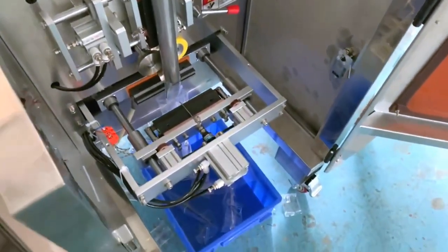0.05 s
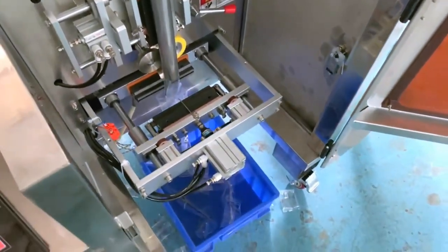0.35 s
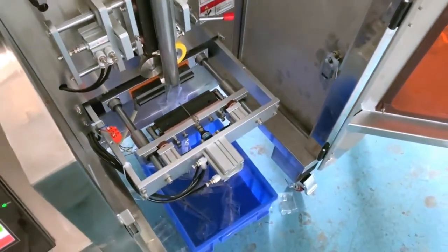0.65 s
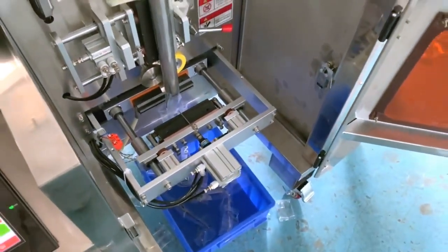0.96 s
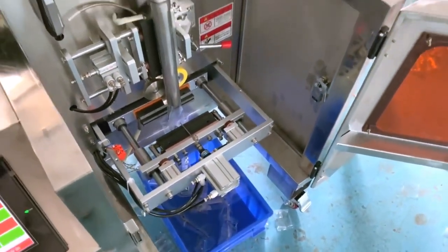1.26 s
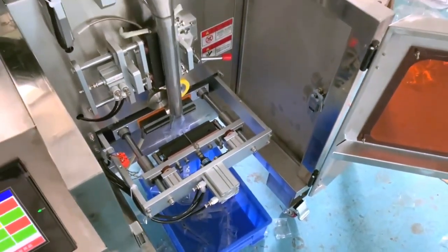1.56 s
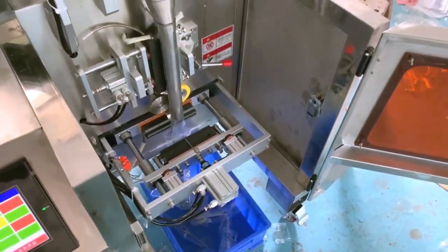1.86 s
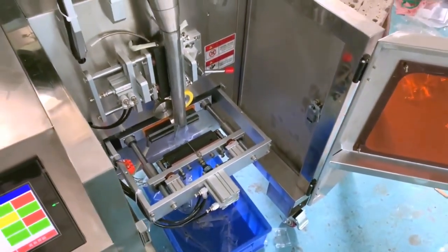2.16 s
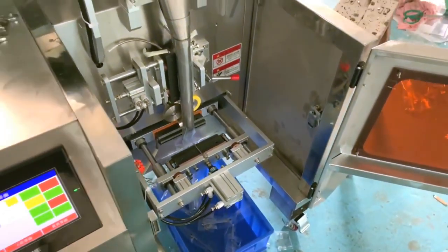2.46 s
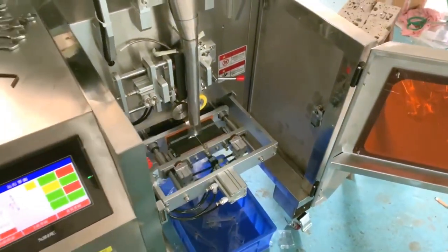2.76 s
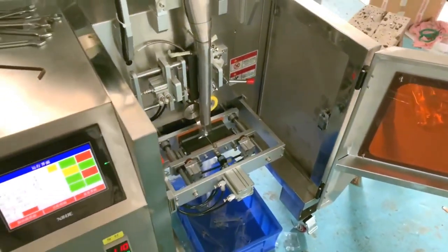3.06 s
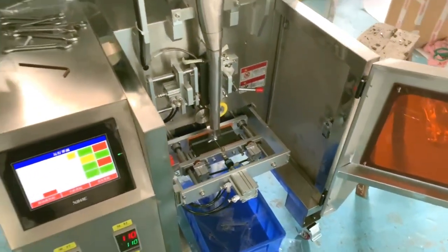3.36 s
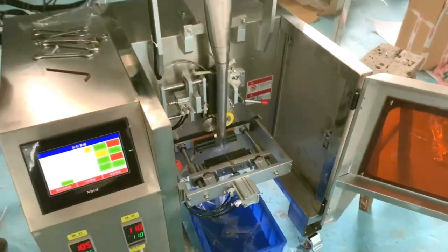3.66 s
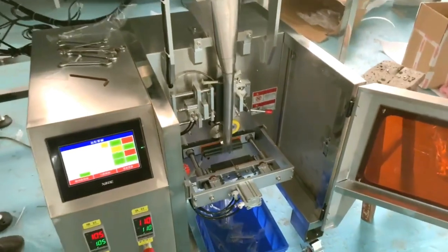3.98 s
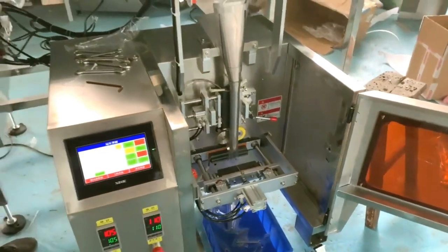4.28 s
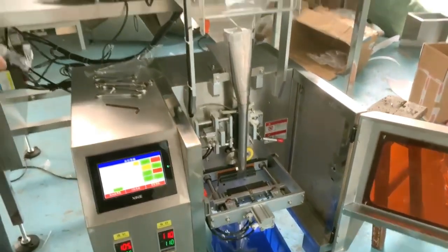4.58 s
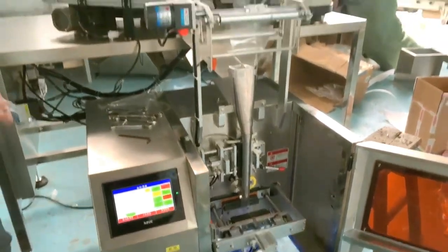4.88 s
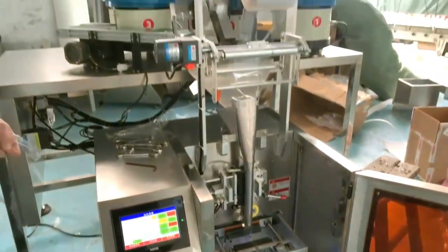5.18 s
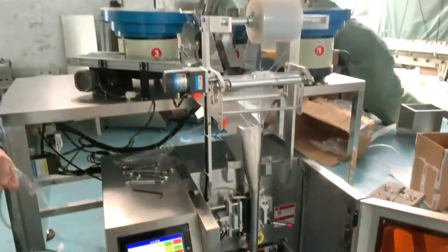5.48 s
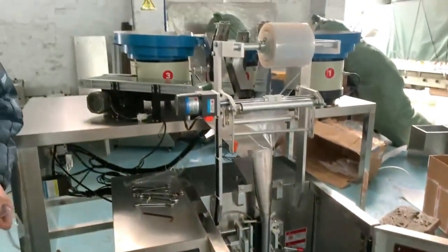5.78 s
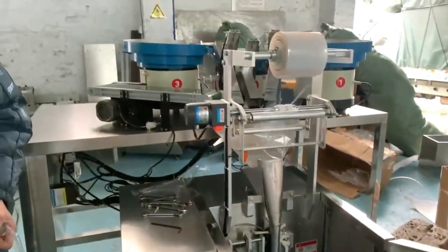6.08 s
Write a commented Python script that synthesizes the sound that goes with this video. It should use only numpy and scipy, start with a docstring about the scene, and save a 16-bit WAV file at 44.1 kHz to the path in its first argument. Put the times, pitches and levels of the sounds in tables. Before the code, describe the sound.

Small metal parts clatter down a chute and pour into a ringing funnel while a bagging machine puffs air and clacks in a factory hall.

```python
"""Small steel parts clatter on a chute and later pour down a ringing funnel: a bagging machine at work.
Each part cracks, clinks at its own pitches and sets the sheet steel ringing. Air cylinders puff, thud
the sealing jaws shut, knock them open with a squeak and snap a gate. At the start, vibrating bowl
feeders jingle and hum, then stop. It all echoes in a factory hall over the drone of other machines."""
import sys
import numpy as np
from scipy import signal
from scipy.fft import rfft, irfft, next_fast_len
from scipy.io import wavfile
from scipy.ndimage import map_coordinates

SR = 44100
rng = np.random.default_rng(int(sys.argv[2]) if len(sys.argv) > 2 else 0)


def output_pcm(signal):
    """Save a mono or channel-first signal as 16-bit PCM at the path in sys.argv[1].

    Samples are clipped to [-1, 1] before scaling.
    """
    pcm = np.clip(np.atleast_2d(signal).T, -1, 1) * 32767
    wavfile.write(sys.argv[1], SR, np.round(pcm).astype(np.int16))


N = 274961
TIME = np.arange(N) / SR

# Parts hitting the chute; the three strengths feed the layers of each hit:
# (time [s], hit [dB], clang [dB], clang pitch [Hz], blow to the sheet [dB], spot's favoured pitch [Hz])
STRIKES = [(0.346, -16.5, -44, 4500, -32, 900), (0.3586, -9, -13.5, 3976, -24, 900),
           (0.4051, -10.5, -27, 5200, -23.5, 1250), (0.421, -25.5, -39.5, 4053, -28, 1250),
           (0.4363, -14, -37, 4940, -37, 1100), (0.54, -25, -42.5, 3800, -43, 900),
           (0.711, -18, -32, 5280, -21.5, 1700), (0.7283, -11.5, -22, 4210, -12.5, 1150),
           (0.7497, -15.5, -21.5, 3870, -17, 1400), (0.764, -17, -31, 3970, -22, 1200),
           (0.7859, -10, -30, 4700, -23.5, 1500), (0.8, -16, -37.5, 3440, -31, 1200),
           (0.92, -19, -51, 4570, -36.5, 1000), (0.934, -17, -40, 5170, -22.5, 1000),
           (0.95, -16.5, -39.5, 3820, -28, 1400), (1.041, -11.5, -19, 3470, -14, 1010),
           (1.06, -27, -25, 3970, -19, 1800), (1.086, -11, -39, 3380, -24.5, 2300),
           (1.0906, -8, -28.5, 3930, -20, 2000), (1.106, -25, -36, 4780, -28.5, 1900),
           (1.1491, -15.5, -36, 4140, -42, 1200), (1.257, -19, -45, 3750, -23.5, 1000),
           (1.317, -22, -40, 4600, -27, 1500), (1.3775, -13, -25, 3690, -30, 1600),
           (1.4024, -22, -26.5, 3746, -18.5, 900), (1.42, -17, -31, 3760, -17, 950),
           (1.4596, -29, -28, 4830, -21.5, 1000), (1.482, -24, -27.5, 3757, -32, 900),
           (1.5362, -18.5, -36.5, 4780, -37, 1200), (1.548, -29, -39.5, 2620, -36, 1500),
           (1.5895, -16, -32.5, 6630, -27, 1200), (1.611, -30, -34, 5200, -26, 1100),
           (1.714, -36.5, -49, 4570, -35, 900), (1.7746, -12.5, -30, 3760, -32, 1400),
           (1.787, -22.5, -40.5, 5500, -35.5, 1400), (1.8003, -19.5, -39, 6440, -30, 1400),
           (1.823, -34, -49.5, 4640, -38.5, 1200), (1.892, -43.5, -45, 6220, -38.5, 1200)]
# Body of a struck part: (pitch ratio [x], level [dB], t60 [s])
CLANG_MODES = [(1, 0.5, 0.059), (1.085, 1, 0.018), (0.87, -7.5, 0.03), (1.27, -4, 0.019), (1.42, -1, 0.018)]
# Ring of a part, the chute, the funnel and the gate: (pitch [Hz], level [dB], t60 [s])
PING_MODES = [(9700, 5.5, 0.016), (11300, 10, 0.005), (11650, 2.5, 0.023), (11100, -14, 0.023),
              (12560, -10, 0.011)]
CHUTE_MODES = [(638, -5.5, 0.24), (678, -9.5, 0.84), (800, -2, 0.4), (891, 2.5, 0.32), (1043, -2, .2),
               (1129, -2.5, 0.14), (1178, -2, 0.32), (1305, -3.5, 0.27), (1415, -6, .32),
               (1722, -0.5, 0.64), (1900, 2, 0.32), (1980, -9, 0.33), (2353, -8, 0.16), (3215, -3, 0.1)]
FUNNEL_MODES = [(139.4, -17, 1.9), (284, -15.5, 10.6), (371, -17, 5.8), (378.4, -13, 12), (440, -17, 3.3),
                (637, -16.5, 6.4), (678, -3.5, 0.88), (728, 3.5, 0.73), (797, 0.5, 0.46), (806, -5.5, 5),
                (891.7, 2.5, 0.63), (985.4, 3.5, 0.54), (1046, -7.5, 2.3), (1093, -2.5, 0.47),
                (1301, -12, 1.2), (1424, -4, 0.86), (1464, -6, 2), (1536, -1, 0.4), (1594, -11, 2.7),
                (1690, -5, 0.46), (1740, 0.5, 0.358), (1882, 1, 0.53), (2181, -3.5, 0.9), (2460, -2, 0.24),
                (2483, 0.5, 0.19), (2950, -1, 0.23), (3138, 1, 0.1), (3350, 4, 0.23), (3920, -6, 0.23)]
GATE_MODES = [(1950, 7.5, 0.046), (2116, 7.5, 0.04), (2340, 3, .04), (11000, 9, 0.1), (11410, 10.5, 0.067),
              (14900, -7, .08)]
# Tones of the low hum that lingers after the jaws meet: (pitch [Hz], relative level [dB], t60 [s])
LOW_HUM_MODES = [(87, -2, 1.66), (122, -7.5, 1.6), (143.6, -4.5, 1.35), (187.3, 2, 1.75), (195.8, -6, 1.4),
                 (259, 0, 1.2), (317, 0.5, 0.62), (690, -8.5, 1.1)]
# Tone of the parts cracking, rattling, hitting sheet steel, tumbling, jingling: (frequency [Hz], gain [dB])
CRACK_EQ = [(300, -27), (1500, -6), (2600, -19.5), (3500, -4), (4800, -4), (5800, -5), (7200, 4.5),
            (9000, 9.5), (11500, -0.5), (16000, -1)]
RATTLE_EQ = [(800, -17.5), (1800, -4.5), (2700, -11), (3600, 5.5), (4300, 0.5), (5200, 4.5), (6500, -3.5),
             (11000, -17.5), (16000, -10)]
SHEET_EQ = [(100, -23.5), (400, -3.5), (580, -6), (750, 1), (1400, 3), (2200, -2.5), (3400, -1),
            (5000, -6.5), (10000, -25.5)]
TUMBLE_EQ = [(500, -13.5), (1800, -7), (2600, -0.5), (3200, 1), (4200, -1), (5500, 2), (7200, 7),
             (10500, 3), (16000, 1.5)]
JINGLE_EQ = [(150, -20), (400, -6), (700, -0.5), (1500, -6), (2500, -6), (3600, -3), (5000, -4.5),
             (7500, 0.5), (10500, 2.5), (12000, 2.5), (16000, -3)]
# Heavy landings in the funnel: (time [s], clink strength [dB], blow to the wall [dB], attack [s])
LANDINGS = [(5.047, -14.5, -29.5, 0.0011), (5.072, -26, -28, 0.0021), (5.1453, -15, -41, 0.002),
            (5.18, -28, -34, 0.0027), (5.247, -22, -29.5, 0.0041), (5.265, -40, -25, 0.0018),
            (5.29, -38, -26.5, 0.0027), (5.31, -31, -29, 0.0028), (5.34, -19, -26, 0.0049),
            (5.4, -38, -26.5, 0.0011), (5.505, -28, -35, 0.0016), (5.52, -28, -30.5, 0.0029),
            (5.566, -27.5, -32, 0.0076), (5.624, -35, -38, .004), (5.696, -34, -38.5, 0.0027)]
# Sealing cycles: (valve opens [s], closing travel [s], air strength [dB], thud of the jaws [dB],
# strength of the low hum relative to the thud [dB], knock on the open stop [dB])
CYCLES = [(0.206, 0.052, -30, -24.5, -21, -33), (3.3284, 0.15, -39, -27.5, -8.5, -20.5),
          (4.953, 0.048, -41, -27, -14, -21)]
# Piston seals on a slow closing stroke: (time [s], relative level [dB], t60 [s], pitch [Hz])
CLOSING_SQUEAKS = [(3.375, -27, 0.027, 11050), (3.486, -31, 0.19, 7340), (3.482, -35.5, 0.14, 3930),
                   (3.479, -28.5, 0.11, 11030)]
# The seals after every opening stroke: (pitch [Hz], relative level [dB])
RETURN_SQUEAKS = [(7175, -42), (9820, -47), (13650, -48)]
# The gate snaps shut and bounces: (time [s], level [dB], attack [s], t60 [s])
GATE_HITS = [(2.6497, -6.5, 0.00041, 0.018), (2.6555, -13.5, 0.00045, 0.029), (2.665, -24, 0.001, 0.057)]
# Tone of exhaust air, jaws setting off, meeting and opening, and the gate: (frequency [Hz], gain [dB])
PUFF_EQ = [(60, -5), (130, 9), (250, 2), (360, 9.5), (600, -1.5), (1500, -3), (2200, 2), (3400, 2.5),
           (4800, -3.5), (7200, 5.5), (9500, 0.5), (11300, 3.5), (13000, -2.5), (16000, -9)]
JOLT_EQ = [(40, -15), (90, -3.5), (150, 1), (240, -3.5), (400, -4.5), (600, -0.5), (800, 1.5), (1000, 7),
           (1300, -7.5), (2200, -15.5), (3100, -9), (5000, -18.5), (12000, -20)]
THUD_EQ = [(40, -17.5), (90, -10.5), (140, 0.5), (240, -4), (370, -9), (500, 0.5), (620, 0.5), (800, -1.5),
           (950, -4.5), (1300, -11), (2800, -16.5), (5000, -26.5), (12000, -34)]
KNOCK_EQ = [(60, -17.5), (140, -4.5), (210, -10), (320, 3.5), (420, -5.5), (700, -4.5), (920, -0.5),
            (1040, -2), (1210, 4), (1400, -3), (1600, 3), (1900, -9.5), (2300, -12), (2900, -7),
            (5000, -26.5), (12000, -29.5)]
GATE_EQ = [(80, -6), (300, -4), (550, -3.5), (1400, -5.5), (2050, -3.5), (2900, -3.5), (4000, 3),
           (5500, -5), (7000, 8.5), (9500, 1.5), (11200, 3.5), (16000, 1.5)]
# Hum of each bowl feeder: (switch-off [s], mains tone [dB], its octave [dB])
FEEDERS = [(0.251, -51, -46), (1.1, -47, -70)]
# Tone of the other machines and the hall's reverb: (frequency [Hz], gain [dB])
ROOM_TONE_EQ = [(25, -13), (45, -2), (75, 3), (130, -6), (210, -4.5), (320, 1.5), (420, -6), (620, 1.5),
                (800, -6.5), (1300, -6.5), (1580, -7.5), (1850, -16.5), (3200, -17), (5000, -23.5),
                (14000, -34.5)]
REVERB_EQ = [(100, 4), (400, 0.5), (1500, -5.5), (5000, -7), (14000, -19.5)]
# Notches that hollow the treble of the whole mix: (frequency [Hz], gain [dB])
TREBLE_NOTCH_EQ = [(20, 0.5), (7400, 0), (8300, -19), (9600, 3), (11500, -3.5), (12500, -33), (13400, -21),
                   (15000, -11.5), (16000, -21)]
# Decay of the hall: (frequency [Hz], t60 [s])
REVERB_T60 = [(100, 0.49), (500, 0.83), (2000, 1.19), (6000, 0.67), (14000, 1.1)]
# Stereo width of diffuse sound: (frequency [Hz], left-right correlation [-1 to 1])
STEREO_CORRELATION = [(100, 1), (280, 1), (600, 0.7), (1200, 0.44), (2400, 0.38), (4500, -0.054),
                      (7200, 0.22), (9800, -0.62), (11000, 1), (15000, 0.62)]
# The image drifts towards centre as the microphone is carried back: (time [s], lead of the left port [ms])
LEFT_LEAD = [(0, 0.25), (2, .25), (2.65, 0.15), (3.4, 0.086), (6.2, 0.074)]

# Envelopes: (attack [s], t60 [s])
RATTLE_ENV, SURGE_ENV = (0.0051, 0.1), (0.012, 0.32)
TICK_ENV, PUFF_ENV, GATE_AIR_ENV = (0.001, 0.027), (0.011, 0.68), (0.028, 0.87)
JOLT_ENV, KNOCK_ENV, RETURN_ENV = (0.0027, 0.12), (0.0006, 0.094), (0.034, 0.14)

# Layers of a chute hit, relative to its strengths in STRIKES
CONTACT_DB, CRACK_DB, CLINK_DB, PING_DB = 9, -2, 15.5, -8
CLANG_DB, RATTLE_DB, SHEET_BODY_DB, CHUTE_RING_DB = 4.5, -8, -14, 14
CLINK_T60_S = 0.1
# Layers of the pour, relative to the slide or landing that drives them
WALL_DB, FUNNEL_RING_DB, TUMBLE_DB, SURGE_DB, LANDING_CLINK_DB = -3, -5, 1.5, -3.5, 25
# Layers of a sealing cycle, relative to their strengths in CYCLES and the squeak tables
PUFF_DB, JOLT_DB, MEET_HUM_DB, STOP_HUM_DB, SQUEAK_DB = 6, 7.5, -8, -30.5, 8


def chute_strikes(attack_s=0.0012, skitter_t60_s=0.055, reference_db=-28.5, doubling_db=17):
    """Each part cracks on the chute, clangs, clinks, chatters on and sets the sheet ringing."""
    times, hit_db, clang_db, pitch_hz, sheet_db, spot_hz = np.transpose(STRIKES)
    t60 = skitter_t60_s * 2 ** ((reference_db - hit_db) / doubling_db)  # softer hits skitter longer

    def force(db):
        return bursts(zip(times, db, np.full(len(times), attack_s), t60))

    clinks, clangs, sheet_ring = np.zeros((3, N))
    t = TIME[:SR // 5]
    for k, start in enumerate(((times + attack_s) * SR).astype(int)):
        add(clinks, start, from_db(hit_db[k] + CLINK_DB) * clink(CLINK_T60_S, partials=24))
        add(clinks, start, from_db([hit_db[k] + CONTACT_DB]))  # the click of first contact
        touch = rng.standard_normal(len(t)) * from_db(clang_db[k] + CLANG_DB - 60 * t / t60[k])
        modes = [(pitch_hz[k] * ratio, db, decay) for ratio, db, decay in CLANG_MODES]
        add(clangs, start, ringing(touch, modes))
        add(sheet_ring, start, from_db(sheet_db[k] + CHUTE_RING_DB) * chute_ring(spot_hz[k]))
    crack = coloured(force(hit_db + CRACK_DB) + clinks, CRACK_EQ)
    body = coloured(force(sheet_db + SHEET_BODY_DB), SHEET_EQ)
    chatter = envelope([(s, db + RATTLE_DB, *RATTLE_ENV) for s, db in zip(times, clang_db)])
    rattle = collisions(chatter, per_s=980, spread_db=-0.5, t60=0.018)
    ping = ringing(force(hit_db + PING_DB), PING_MODES)
    return crack + body + sheet_ring + clangs + coloured(rattle, RATTLE_EQ) + ping


def chute_ring(spot_hz, octave_loss_db=7.5, spread_db=3):
    """The chute after one blow: the struck spot favours the modes near one pitch."""
    hz, db, t60 = np.transpose(CHUTE_MODES)[:, :, None]
    t = TIME[:SR // 2]
    db = db - octave_loss_db * np.log2(hz / spot_hz) ** 2 + spread_db * rng.standard_normal(hz.shape)
    tones = np.sin(2 * np.pi * (hz * t + rng.random(hz.shape)))
    return unit(np.sum(from_db(db - 60 * t / t60) * tones, axis=0))


def funnel_pour(start_s=5.046, attack_s=0.0074, drive_db=-29):
    """A batch lands in the funnel, tumbles and drains away; the sheet steel rings on, wavering."""
    onset = np.clip((TIME - start_s) / attack_s, 0, 1)
    flow = from_db(drive_db) * fade(from_s=5.43, db_per_s=32.5)
    impacts = 0.98 * bursts([(s, db, attack, 0.14) for s, db, _, attack in LANDINGS])
    blows = bursts([(s, db, attack, 0.14) for s, _, db, attack in LANDINGS])
    sliding = onset * flow * rng.standard_normal(N)
    wall = from_db(WALL_DB) * coloured(sliding + 1.37 * blows, SHEET_EQ)
    ring = ringing(sliding + 1.2 * blows, FUNNEL_MODES, tremolo=lambda: 1 + 0.38 * waver(per_s=35))
    clinking = flow * from_db(TUMBLE_DB) * fade(start_s, db_per_s=18)  # softer as the parts slow down
    # each landing stirs up the other parts
    surge = envelope([(s, db + SURGE_DB, *SURGE_ENV) for s, _, db, _ in LANDINGS])
    tumble = onset * collisions(np.hypot(clinking, surge), per_s=520, spread_db=3.5, t60=0.054)
    for s, db, _, attack in LANDINGS:
        landing = from_db(db + LANDING_CLINK_DB) * clink(CLINK_T60_S, partials=28)
        add(impacts, int((s + attack) * SR), landing)
    return wall + from_db(FUNNEL_RING_DB) * ring + coloured(tumble + impacts, TUMBLE_EQ)


def clink(t60, partials):
    """One small steel part rings briefly at random pitches of its own."""
    t, hz = TIME[:3500], rng.uniform(900, 13000, (partials, 1))
    return unit(np.sin(2 * np.pi * hz * t).sum(0) * from_db(-60 * t / t60))


def collisions(gain, per_s, spread_db, t60, variants=60):
    """Parts touch at random, each clinking with a strength of its own under a gain envelope."""
    clinks = [clink(t60, partials=6) for _ in range(variants)]
    starts = np.flatnonzero(rng.random(N) < per_s / SR)
    sizes = from_db(spread_db * np.minimum(rng.exponential(1, N)[starts], 3))
    kinds = rng.integers(0, variants, N)[starts]
    strengths = unit(sizes) * np.sqrt(N) * gain[starts]
    out = np.zeros(N)
    for start, strength, kind in zip(starts, strengths, kinds):
        add(out, start, strength * clinks[kind])
    return out


def sealing_jaws(release_after_s=0.815, opening_s=0.066, tick_db=-42, release_db=-38, leak_db=-52):
    """A valve ticks, air puffs, the jaws jolt and meet, seal with a faint hiss, fly open and squeak."""
    puffs, jolts, thuds, knocks = [], [], [], []
    leak, hum = np.zeros((2, N))
    squeaks = [(s, db, 0.019, t60, hz) for s, db, t60, hz in CLOSING_SQUEAKS]
    for s, travel, air_db, meet_db, hum_db, stop_db in CYCLES:
        meet, release = s + travel, s + release_after_s
        stop = release + opening_s
        puffs += [(s, tick_db, *TICK_ENV), (s, air_db + PUFF_DB, *PUFF_ENV)]
        jolts += [(s + 0.0084, air_db + JOLT_DB, *JOLT_ENV)]
        thuds += [(meet, meet_db, 0.121 * travel, 0.31)]  # a slow closing lands with a soft attack
        add(hum, int(meet * SR), from_db(meet_db + hum_db + MEET_HUM_DB) * low_hum())
        leak += from_db(leak_db) * (TIME > meet) * (TIME < release)
        puffs += [(release, release_db, *PUFF_ENV)]
        knocks += [(stop, stop_db, *KNOCK_ENV)]
        add(hum, int(stop * SR), from_db(stop_db + STOP_HUM_DB) * low_hum())
        squeaks += [(stop + 0.038, db, *RETURN_ENV, hz) for hz, db in RETURN_SQUEAKS]
    air = coloured(bursts(puffs) + leak * rng.standard_normal(N), PUFF_EQ)
    closing = coloured(bursts(jolts), JOLT_EQ) + coloured(bursts(thuds), THUD_EQ)
    opening = coloured(bursts(knocks), KNOCK_EQ)
    seals = from_db(SQUEAK_DB) * sum(seal_squeak(*row) for row in squeaks)
    return air + closing + opening + hum + seals


def low_hum(depth=0.71):
    """A low, wavering hum, strongest near 190 Hz, lingers after the jaws meet, fainter as they open."""
    t, hum = TIME[:2 * SR], 0
    knots = t[::SR // 30]
    for hz, db, t60 in LOW_HUM_MODES:
        tremolo = 1 + depth * np.interp(t, knots, rng.standard_normal(len(knots)))
        hum += tremolo * from_db(db - 60 * t / t60) * np.sin(2 * np.pi * hz * t)
    return hum


def seal_squeak(s, db, attack, t60, hz):
    """A piston seal sticks and slips: a high, rasping tone of unsteady pitch."""
    pitch_hz = hz * (1 + 0.008 * waver(per_s=1800))
    rasp = 1 + 0.45 * waver(per_s=900)
    return envelope([(s, db, attack, t60)]) * rasp * np.sin(2 * np.pi * np.cumsum(pitch_hz) / SR)


def gate(valve_s=2.521, hold_s=0.505, open_db=-32.5, close_db=-42, air_db=-35, ring_db=-4.5):
    """A valve ticks open, air puffs, the gate snaps against its stop and rings; the valve ticks shut."""
    ticks = [(valve_s, open_db, *TICK_ENV), (valve_s + hold_s, close_db, *TICK_ENV)]
    air = bursts(ticks + [(valve_s, air_db, *GATE_AIR_ENV)])
    snap = bursts(GATE_HITS)
    return coloured(air, PUFF_EQ) + coloured(snap, GATE_EQ) + from_db(ring_db) * ringing(snap, GATE_MODES)


def feeder_jingle(slide_db=-35.5, hop_db=-32.5):
    """In the shaking bowls the parts slide with a hiss and hop with tiny clinks, then settle."""
    settling = fade(from_s=1.51, db_per_s=76)
    sliding = from_db(slide_db) * settling * rng.standard_normal(N)
    hopping = collisions(from_db(hop_db) * settling, per_s=600, spread_db=1.5, t60=0.038)
    return coloured(sliding + hopping, JINGLE_EQ)


def feeder_hum(mains_hz=50, coast_t60_s=0.3):
    """The bowls' magnets drone at mains rate and its octave; switched off, each bowl coasts to rest."""
    phase, drone = 2 * np.pi * mains_hz * TIME, 0
    for stop_s, mains_db, octave_db in FEEDERS:
        tone = from_db(mains_db) * np.sin(phase) + from_db(octave_db) * np.sin(2 * phase)
        drone += fade(stop_s, db_per_s=60 / coast_t60_s) * tone
    return drone


def direct_path(x, shadow_hz=5810):
    """Sound bends round the cabinet, losing treble, and reaches the left port just before the right."""
    lead_ms = np.interp(TIME, *np.transpose(LEFT_LEAD))
    half_lead = lead_ms * SR / 2000
    dulled = signal.sosfilt(signal.butter(1, shadow_hz, fs=SR, output="sos"), x)
    return np.array([map_coordinates(dulled, [np.arange(N) + shift]) for shift in (half_lead, -half_lead)])


def cabinet_reflections(x, t60=0.03, low_cut_hz=890, wander_per_s=3.5, patterns=3):
    """Flurries off the steel walls crossfade as parts land at different spots and the microphone moves."""
    t, reflected = TIME[:SR // 4], 0
    decay = unit(from_db(-60 * t / t60) * (t > 0.001))
    low_cut = signal.butter(1, low_cut_hz, "high", fs=SR, output="sos")
    for k in range(patterns):
        flurry = signal.sosfilt(low_cut, diffuse_noise(len(t)) * decay)
        share = np.cos(np.pi * (wander_per_s * TIME + k / patterns)) * np.sqrt(2 / patterns)
        reflected += share * np.array([convolve(x, side) for side in flurry])
    return reflected


def hall_reverb(x, build_up_s=0.0017):
    """The long tail of the hall, dying band by band."""
    t, white, tail = TIME[:2 * SR], diffuse_noise(2 * SR), 0
    edges_hz = np.geomspace(95, 18000, 11)
    for low, high in zip(edges_hz, edges_hz[1:]):
        band = signal.sosfilt(signal.butter(2, [low, high], "band", fs=SR, output="sos"), white)
        hz = np.sqrt(low * high)
        decay = from_db(-60 * t / at_hz(REVERB_T60, hz)) * np.minimum(t / build_up_s, 1)
        tail += band * from_db(at_hz(REVERB_EQ, hz)) * unit(decay)
    return np.array([convolve(x, side) for side in tail])


def room_tone(level_db=-53.5):
    """Other machines blur into a steady, dark bed of noise."""
    return from_db(level_db) * np.array([coloured(side, ROOM_TONE_EQ) for side in diffuse_noise(N)])


def diffuse_noise(length):
    """White noise at two close microphones: alike in the bass, mostly wider above."""
    size = next_fast_len(length, True)
    mid, side = rfft(rng.standard_normal((2, size)))
    alike = at_hz(STEREO_CORRELATION, np.fft.rfftfreq(size, 1 / SR))
    left_right = np.sqrt((1 + alike) / 2) * mid + np.sqrt((1 - alike) / 2) * side * [[1], [-1]]
    return irfft(left_right, size)[:, :length]


def ringing(x, modes, tremolo=lambda: 1):
    """The distinct modes of a body, each a dying sine that may waver; noise keeps its level."""
    out, energy = 0, 0
    for k, (hz, db, t60) in enumerate(modes):
        radius, angle = from_db(-60 / (t60 * SR)), 2 * np.pi * hz / SR
        drive = [0, (-1) ** k * from_db(db) * np.sin(angle)]
        feedback = [1, -2 * radius * np.cos(angle), radius ** 2]
        out += tremolo() * signal.lfilter(drive, feedback, x + 1e-18)
        energy += from_db(db) ** 2 / (2 * (1 - radius ** 2))
    return out / np.sqrt(energy)


def coloured(x, eq):
    """The dense, quickly damped resonances of a body; noise keeps its level."""
    return convolve(x, unit(eq_response(eq)))


def eq_response(eq, size=4096):
    """Minimum-phase response of an EQ curve: nothing sounds before the blow."""
    cepstrum = irfft(np.log(from_db(at_hz(eq, np.fft.rfftfreq(size, 1 / SR)))))
    cepstrum[1:size // 2] *= 2
    cepstrum[size // 2 + 1:] = 0
    return irfft(np.exp(rfft(cepstrum)))


def envelope(events):
    """Gain of events that swell and die away: (time [s], level [dB], attack [s], t60 [s])."""
    power, t = np.zeros(N), TIME[:2 * SR]
    for s, db, attack, t60 in events:
        decay = from_db(db - 60 * np.maximum(t - attack, 0) / t60)
        add(power, int(s * SR), decay ** 2 * np.minimum(t / attack, 1))
    return np.sqrt(power)


def bursts(events):
    """Enveloped noise: the rough force of a blow or a rush of air."""
    return envelope(events) * rng.standard_normal(N)


def fade(from_s, db_per_s):
    """A gain that holds, then dies away evenly."""
    return from_db(-db_per_s * np.maximum(TIME - from_s, 0))


def waver(per_s):
    """Smooth random modulation with a spread near 1 and so many new values a second."""
    knots = rng.standard_normal(N // 4)
    return np.interp(TIME * per_s, np.arange(len(knots)), knots)


def from_db(db):
    """Decibels to gain."""
    return 10 ** (np.asarray(db) / 20)


def unit(response):
    """Scale to unit energy."""
    return response / np.sqrt(np.sum(response ** 2))


def at_hz(curve, hz):
    """Read a curve on a log-frequency axis."""
    known_hz, values = np.transpose(curve)
    return np.interp(np.log(hz + 1), np.log(known_hz), values)


def convolve(x, response):
    """Pass a sound through an impulse response."""
    return signal.oaconvolve(x, response)[:N]


def add(out, start, sound):
    """Mix a short sound in at a sample."""
    out[start:start + len(sound)] += sound[:N - start]


def scene():
    """The machine is heard directly, off its cabinet and through the hall, over hum and room tone."""
    machine = feeder_jingle() + chute_strikes() + funnel_pour() + sealing_jaws() + gate()
    near = from_db(-1) * (direct_path(machine) + cabinet_reflections(machine))
    bed = feeder_hum() + room_tone()
    return near + hall_reverb(machine) + bed


def record(dry, stopband_hz=16700):
    """Deep notches near 8.3 and 12.5 kHz hollow the treble; a steep low-pass cuts the top."""
    notched = np.array([convolve(side, eq_response(TREBLE_NOTCH_EQ)) for side in dry])
    return signal.sosfilt(signal.cheby2(14, 70, stopband_hz, fs=SR, output="sos"), notched)


dry = scene()
out = record(dry)
output_pcm(out)
```